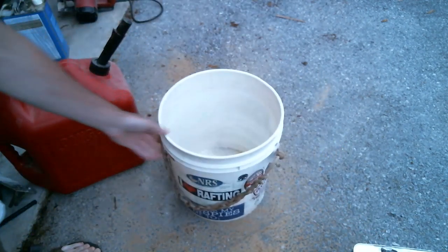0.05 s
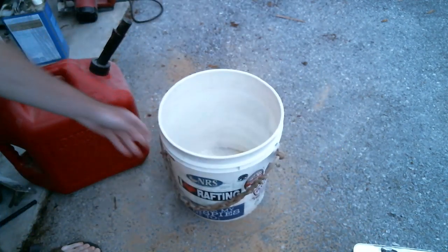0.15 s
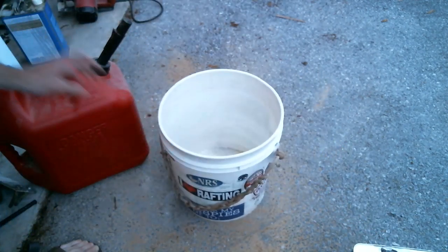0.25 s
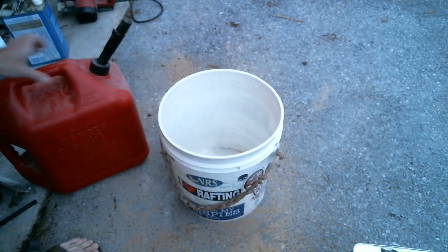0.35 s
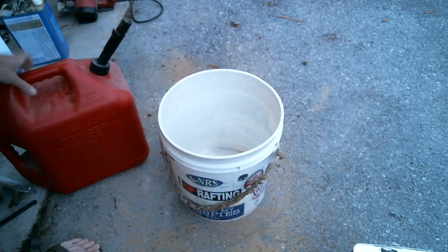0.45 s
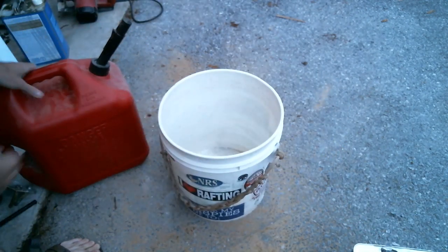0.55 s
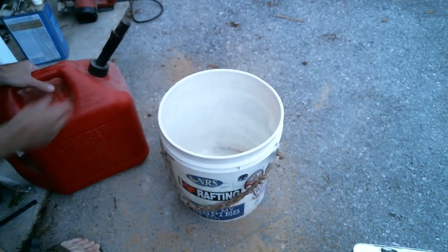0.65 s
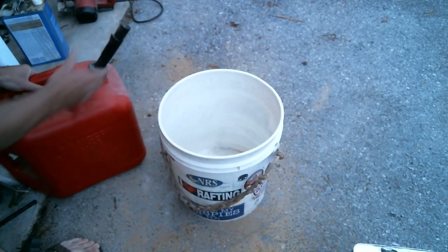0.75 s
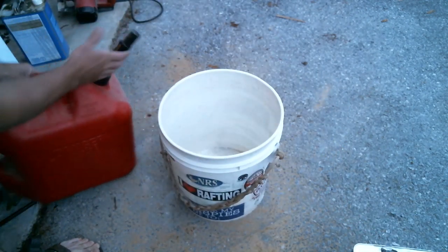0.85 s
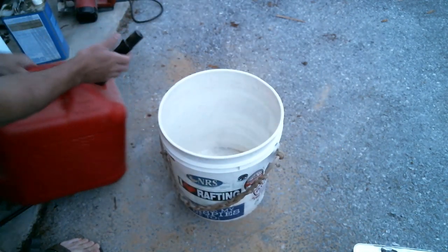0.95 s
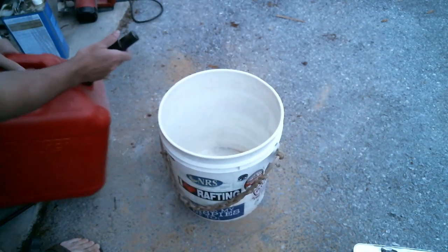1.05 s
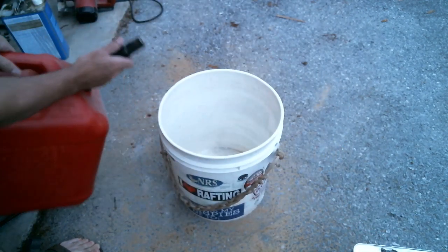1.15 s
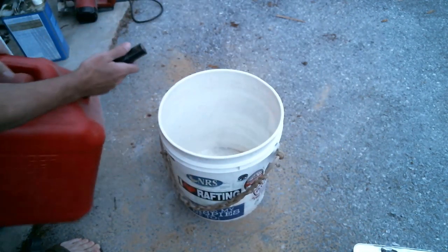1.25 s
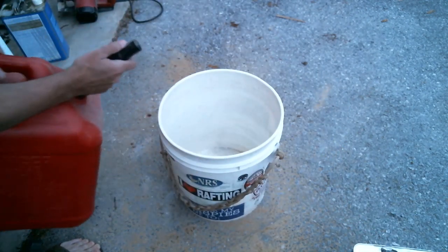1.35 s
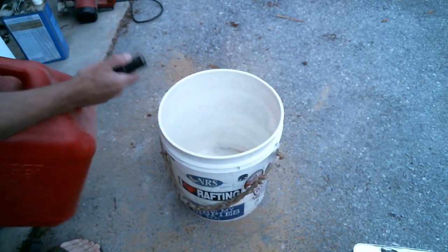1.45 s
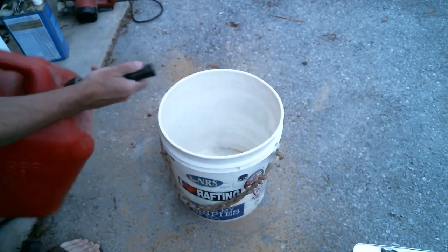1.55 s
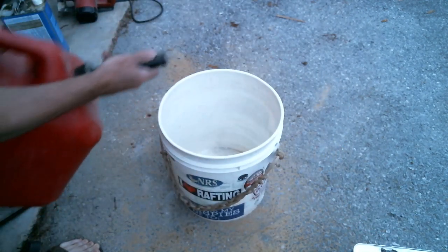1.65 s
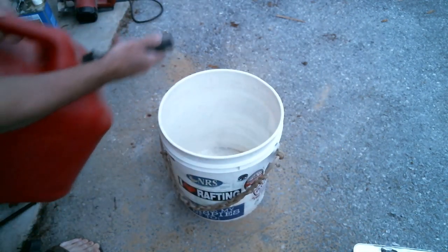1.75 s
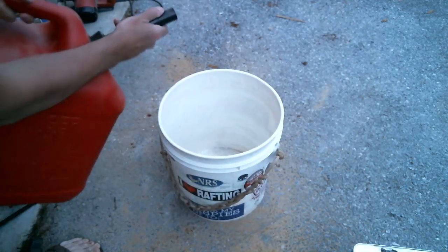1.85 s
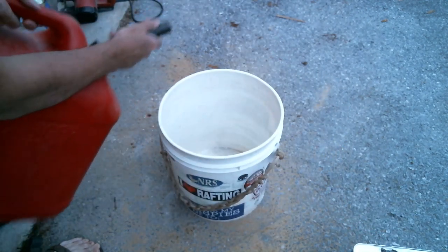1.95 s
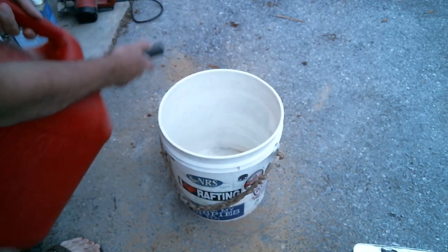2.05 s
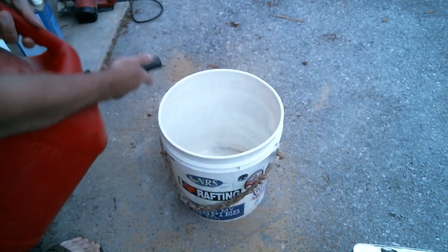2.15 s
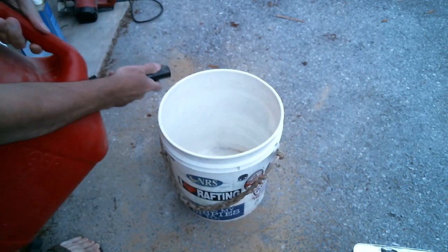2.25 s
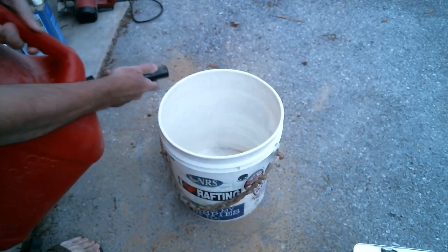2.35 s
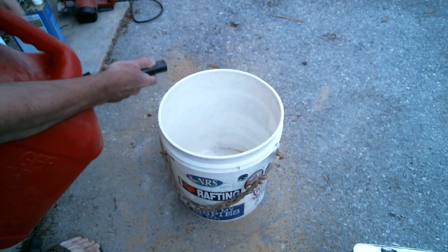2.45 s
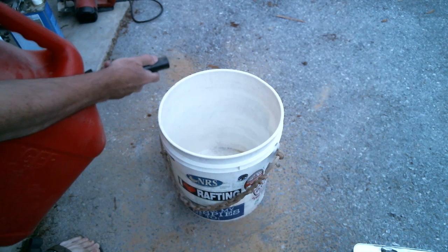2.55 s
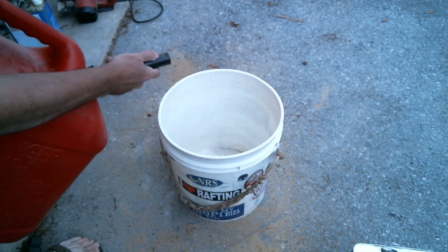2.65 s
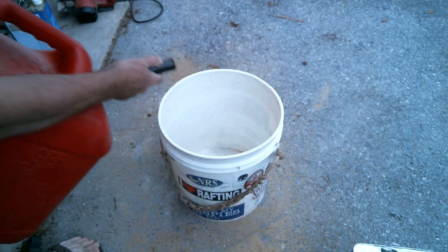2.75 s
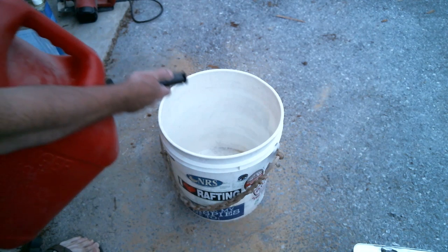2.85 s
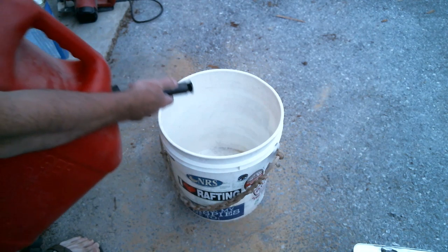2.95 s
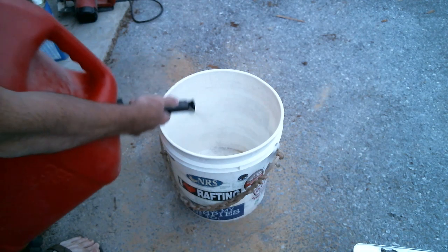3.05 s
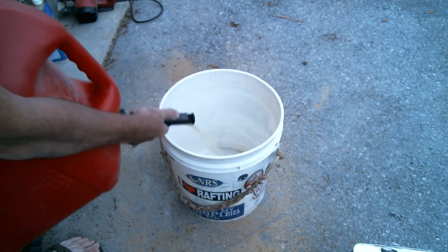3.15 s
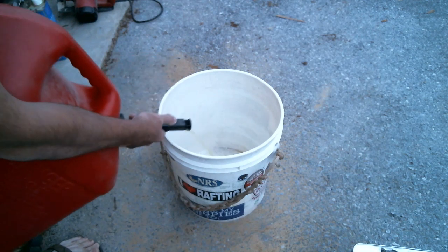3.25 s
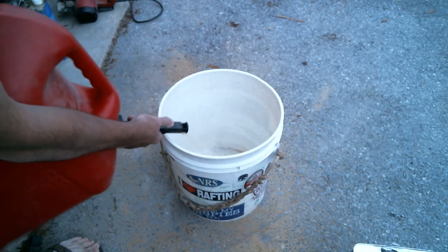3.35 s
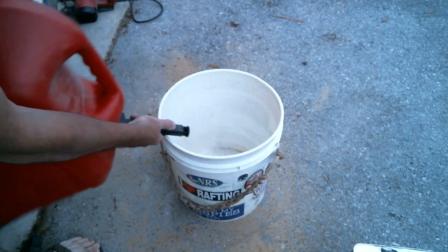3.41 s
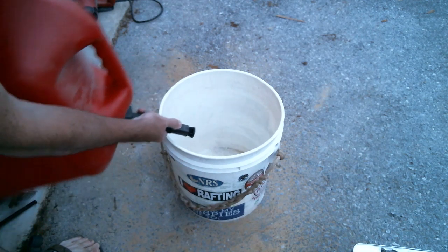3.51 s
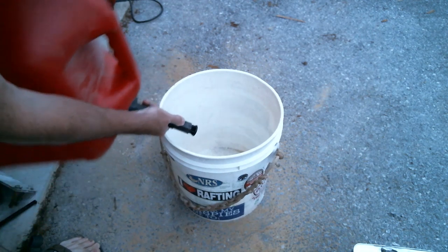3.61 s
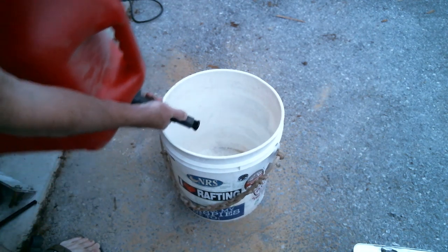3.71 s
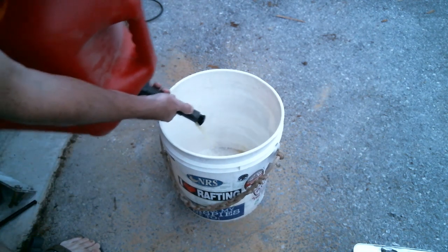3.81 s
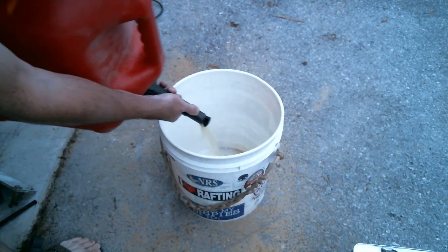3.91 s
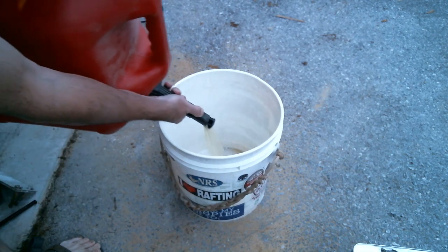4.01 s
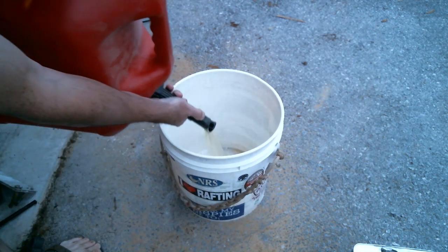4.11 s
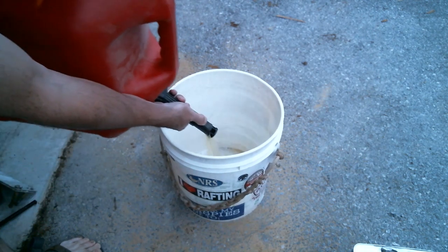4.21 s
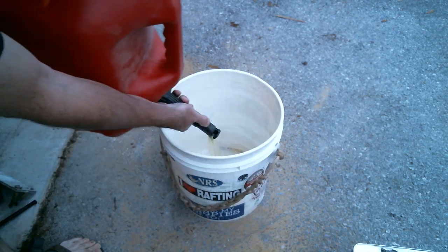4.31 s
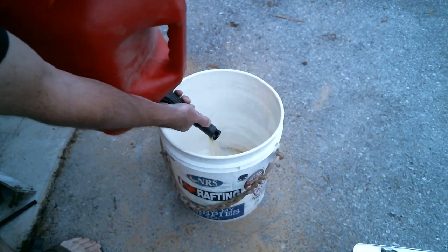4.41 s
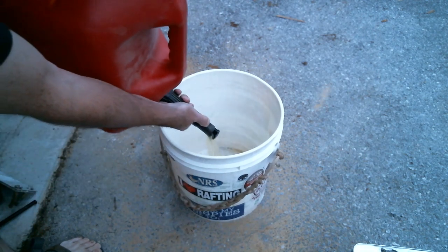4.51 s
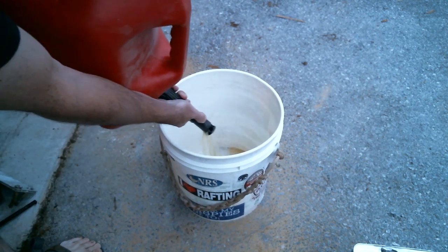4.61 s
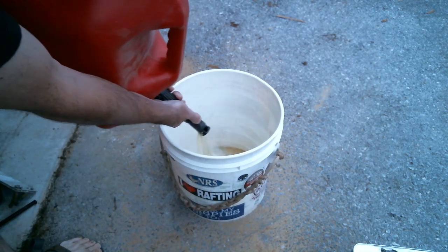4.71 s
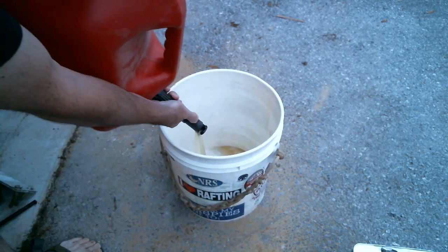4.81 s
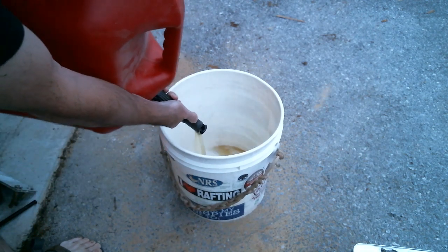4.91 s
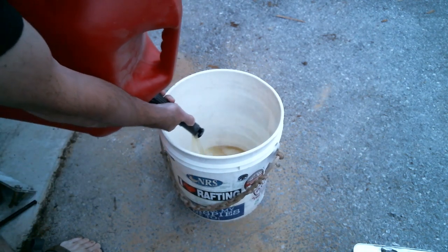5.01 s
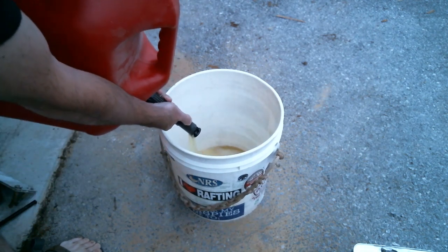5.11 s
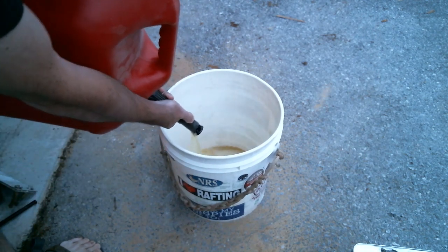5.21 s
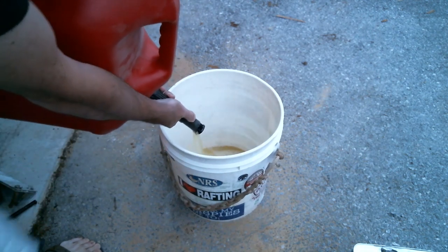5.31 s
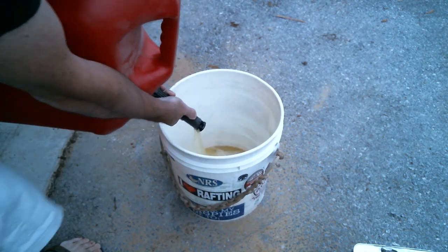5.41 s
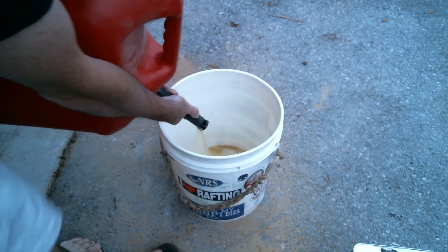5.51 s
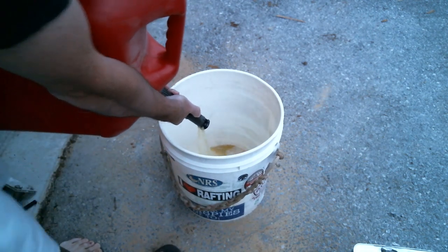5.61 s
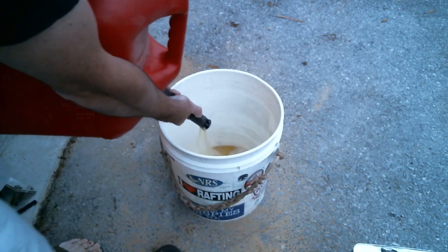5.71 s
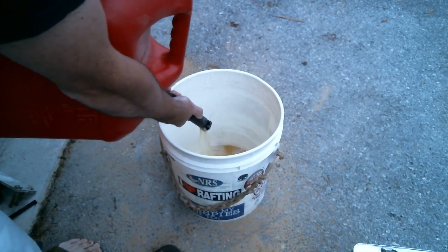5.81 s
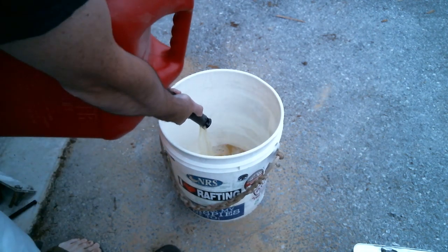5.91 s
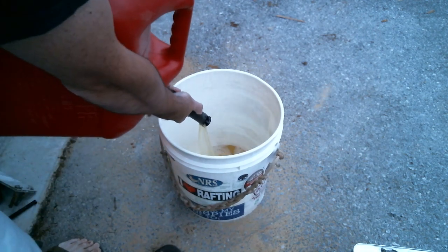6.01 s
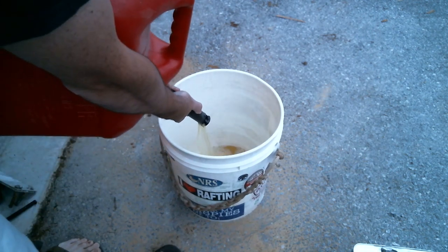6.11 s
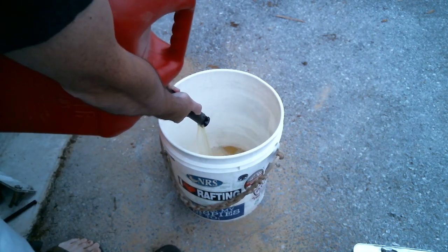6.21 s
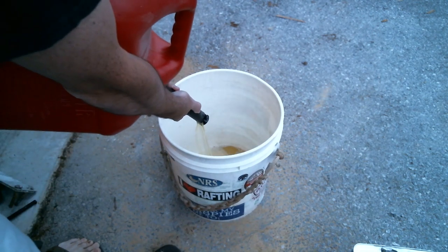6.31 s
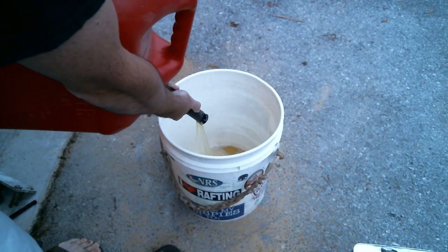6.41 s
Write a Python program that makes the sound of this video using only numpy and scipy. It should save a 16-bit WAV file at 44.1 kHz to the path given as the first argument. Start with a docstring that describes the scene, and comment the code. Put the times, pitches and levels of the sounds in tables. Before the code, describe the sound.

A plastic fuel can is gripped, knocked and tipped outdoors, then liquid splatters in drops and a broken stream into a hollow plastic bucket.

```python
"""Outdoors a bucket rings and takes a soft thud while hum tones fade; a far engine idles under steady air.
A full plastic fuel can is gripped, dragged, lifted and tipped: noise rubs, struck modes and gliding glugs.
Early on something metal clinks once, a set of dying partials. First drops, then a broken stream splash into
the plastic bucket: random droplet noise through resonances of its walls, air column and floor.
One microphone feeds both channels."""
import sys
import numpy as np
from scipy import signal
from scipy.io import wavfile
from scipy.ndimage import uniform_filter1d

SR = 44100
rng = np.random.default_rng(int(sys.argv[2]) if len(sys.argv) > 2 else 0)


def to_wav(s):
    """Save 16-bit WAV."""
    ch = np.atleast_2d(s).T  # columns
    pcm = np.round(np.clip(ch, -1, 1) * 32767)  # PCM
    wavfile.write(sys.argv[1], SR, pcm.astype(np.int16))


def decibels_to_gain(level_db):
    """Convert a level in decibels to a linear amplitude gain (20 dB per decade)."""
    exponent = np.asarray(level_db, float) / 20
    return 10 ** exponent


N = 284886  # samples
T = np.arange(N) / SR  # seconds
COLUMN_HZ, FLOOR_HZ = 1000, 265  # the bucket's air column and its floor


def evened(x):
    """Scales to rms 1."""
    return x / np.sqrt(np.mean(x ** 2) + 1e-20)


def curve(tables, count, rest=-120.):
    """Joins column count of one or more tables over time, resting outside them."""
    out = np.full(N, rest)
    for table in tables:
        table = np.array(table)
        inside = (T >= table[0, 0]) & (T <= table[-1, 0])
        out[inside] = np.interp(T[inside], table[:, 0], table[:, count])
    return out


def add(mix, start_s, sound):
    """Lays a sound into the mix at a time."""
    part = mix[max(round(start_s * SR), 0):][:len(sound)]
    part += sound[:len(part)]


def filtered(x, order, hz, kind):
    """Runs a low or high pass with its corner at hz."""
    return signal.sosfilt(signal.butter(order, hz, kind, fs=SR, output="sos"), x)


def resonate(x, hz, width):
    """Shifts the curve hz down to zero, smooths, and shifts back: a resonance of gain 1."""
    turn = np.exp(2j * np.pi * np.cumsum(hz * np.ones(len(x))) / SR)
    r = np.exp(-np.pi * width / SR)
    return 2 * (turn * signal.lfilter([1 - r], [1, -r], x / turn)).real


def twice(x, hz, width):
    """A steep resonance: the same one applied two times."""
    return resonate(resonate(x, hz, width), hz, width)


def colour(x, spectrum, patchy_db, size):
    """Shapes short-time spectra, with random patches that come and go, to rms 1."""
    hz, _, z = signal.stft(x, SR, nperseg=size, noverlap=size * 3 // 4)
    f, db = np.transpose(spectrum)
    patches = rng.standard_normal(z.shape[::-1]).T
    patches = uniform_filter1d(patches, size=9, axis=0)
    patches = evened(uniform_filter1d(patches, size=9, axis=1))
    shape_db = np.interp(np.log(hz + 1), np.log(f + 1), db)[:, None]
    z = z * decibels_to_gain(shape_db + patchy_db * patches)
    return evened(signal.istft(z, SR, nperseg=size, noverlap=size * 3 // 4)[1][:N])


def droplets(per_s, spread_db, t60):
    """Random impacts, a few large, each a short dying burst of noise."""
    size = decibels_to_gain(spread_db * np.minimum(rng.exponential(1, N), 4))
    size = size * (rng.random(N) < per_s / SR)
    t = T[:3000]
    fade = decibels_to_gain(-120 * t / t60) * np.minimum(t / 0.003, 1)  # of power; wet: a soft start
    power = signal.oaconvolve(size ** 2, fade)[:N]
    return np.sqrt(abs(power)) * rng.standard_normal(N)


def ring(modes, detune, seconds):
    """Dying partials of a struck object."""
    t = T[:round(seconds * SR)]
    return sum(decibels_to_gain(db - 60 * t / t60) * np.sin(2 * np.pi * hz * d * t)
               for (hz, db, t60), d in zip(modes, detune))


def pop(hz, width, t60, noise):
    """A short burst of noise through one broad resonance, peak 1."""
    t = T[:len(noise)]
    burst = noise * decibels_to_gain(-60 * t / t60) * np.minimum(t / 0.0011, 1)
    burst = twice(burst, hz, width)
    return burst / abs(burst).max()


def surges(rows):
    """Gain that swells and sinks in one arch for each row."""
    out = np.zeros(N)
    for start_s, length_s, db in rows:
        arch = np.sin(np.pi * T[:round(length_s * SR)] / length_s) ** 0.8
        add(out, start_s, decibels_to_gain(db) * arch)
    return out


def whistles(rows, width):
    """Lumpy noise swells through one narrow resonance for each row."""
    out = np.zeros(N)
    source = droplets(600, 2.5, .04)
    for start_s, length_s, db, hz in rows:
        part = source[round(start_s * SR):][:round(length_s * SR)]
        arch = np.sin(np.pi * T[:len(part)] / length_s)
        add(out, start_s, decibels_to_gain(db) * arch * evened(twice(part, hz, width)))
    return out


def open_air():
    """Steady low-weighted noise in which faint rustles come and go."""
    # spectrum of the air: hz, relative_db (per Hz)
    air_spectrum = [(50, -27.5), (106, 0), (155, -1.5), (260, -10.5), (867, -19), (10300, -36),
                    (14000, -55)]
    noise = rng.standard_normal(N) + droplets(20, 3., 0.1)
    return decibels_to_gain(-58) * colour(noise, air_spectrum, 2.9, size=1024)


def hum():
    """Thin steady tones that fade out just after the start."""
    # tones: pitch_hz, level_db (rms)
    tone_table = [(382.2, -60.5), (554.5, -68)]
    tones = sum(np.sqrt(2) * decibels_to_gain(db) * np.sin(2 * np.pi * (hz * T + rng.random()))
                for hz, db in tone_table)
    return tones * np.clip((.52 - T) / 0.13, 0, 1)


def engine():
    """A distant idling engine: firings of uneven strength ring the exhaust."""
    # idle level over time: time_s, level_db
    idle_level = [(0, -59.5), (2.2, -56), (3, -79.5), (6.46, -61)]
    # exhaust resonance: centre_hz, width_hz (of its narrower pass), relative_db
    exhaust = [(143, 16, 8)]
    firings_per_s, starting_turn = 16.4, .63
    turns = firings_per_s * T + starting_turn
    strength = decibels_to_gain(2.5 * rng.standard_normal(200))[turns.astype(int)]
    firings = np.diff(np.floor(turns), prepend=0) * strength
    pipe = sum(decibels_to_gain(db) * resonate(resonate(firings, hz, width), hz, 6.1 * width)
               for hz, width, db in exhaust)
    return decibels_to_gain(curve([idle_level], count=1)) * evened(pipe)


def strokes(count):
    """Gain of the rubs in one column: a curved rise in dB to the top, then a fall."""
    # hands, cloth and feet rubbing: start_s, rise_s, fall_s, hiss_top_db, scuff_top_db
    rubs = [(0.501, 0.091, 0.27, -50, -93), (0.79, 0.096, 0.015, -47.5, -39), (1.429, 0.13, 0.2, -44, -67),
            (1.56, 0.36, 0.075, -76, -63), (1.916, 0.024, 0.041, -53.5, -41),
            (2.366, 0.16, 0.054, -36, -40.5), (2.622, 0.03, 0.045, -60, -48.5),
            (2.691, 0.005, 0.042, -65, -47), (2.769, 0.039, 0.038, -45.5, -56.5),
            (3.04, 0.02, 0.031, -62.5, -54.5), (3.715, 0.0031, 0.12, -46.5, -36.5)]
    edge_db = -19.5  # a rub swells from and dies to this far under its top
    out = np.zeros(N)
    for row in rubs:
        start_s, rise_s, fall_s = row[:3]
        t = T[:round((rise_s + fall_s) * SR)]
        from_top = np.maximum(1 - t / rise_s, (t - rise_s) / fall_s)
        add(out, start_s, decibels_to_gain(row[count] + edge_db * from_top ** 1.385))
    return out


def rubbing():
    """Smooth hiss of skin and cloth, with a grainier scuff below it."""
    # spectrum of skin and cloth: hz, relative_db (per Hz)
    hiss_spectrum = [(2060, -70), (3500, -26.5), (8360, -10), (10700, -14.5), (12600, -25.5), (15000, -39)]
    # spectrum of the scuff: hz, relative_db (per Hz)
    scuff_spectrum = [(470, -6), (800, -3.5), (1600, -3.5), (2290, -4.5), (5000, -8), (6500, -15),
                      (11000, -120)]
    hiss = colour(rng.standard_normal(N), hiss_spectrum, 2.0, size=256)
    scuff = colour(droplets(470, 2.5, 0.045), scuff_spectrum, 3.5, size=512)
    return strokes(count=3) * hiss + strokes(count=4) * scuff


def narrow_swells():
    """Drips and bubbles in the fuel can ring briefly: swells of noise through narrow resonances."""
    # drips and bubbles: start_s, length_s, level_db, pitch_hz
    swell_table = [(1.51, 0.11, -56, 1970), (1.52, 0.09, -55.5, 2990), (1.62, 0.13, -53.5, 3050),
                   (1.67, 0.08, -53.5, 875), (1.945, 0.022, -47, 1228), (1.945, 0.051, -48.5, 850),
                   (2.2, 0.036, -53.5, 1213), (2.35, 0.027, -49.5, 1000), (2.47, 0.053, -45.5, 1590),
                   (2.056, 0.052, -55.5, 3130)]
    return whistles(swell_table, 290.0)


def bump():
    """The empty bucket is set down: it still rings, then takes one soft thud."""
    out = np.zeros(N)
    add(out, 0, decibels_to_gain(-32.5) * ring([(219.0, 0.01, 0.6)], [1], 0.074))
    thud = ring([(FLOOR_HZ, 0, .06), (COLUMN_HZ, -20, .08)], [1, 1], .1)
    add(out, .018, decibels_to_gain(-15.5) * thud * np.minimum(T[:len(thud)] / 0.0048, 1))
    return out


def can_knocks():
    """Blows ring the can's walls, crack briefly and make the fuel inside shudder."""
    # blows: start_s, wall_peak_db, crack_db (relative to the walls)
    knocks = [(0.859, -13.5, -4.5), (2.385, -32, -6), (3.724, -13.5, 1.5), (3.815, -17, -9)]
    # modes of the walls: pitch_hz (before detuning), relative_db, t60_s
    can_modes = [(168.6, 8.5, 0.12), (289.7, 13.5, 0.094), (676, 5.5, 0.093), (1688, 2, 0.053)]
    out = np.zeros(N)
    for (start_s, db, bright_db), chance in zip(knocks, rng.standard_normal((len(knocks), 4000))):
        walls = ring(can_modes, 1 + 0.094 * chance, .15)
        add(out, start_s, decibels_to_gain(db) * walls / abs(walls).max())
        add(out, start_s, decibels_to_gain(db + bright_db) * pop(480, 2550, 0.094, chance))
        add(out, start_s, decibels_to_gain(db - 3.0) * pop(318, 430, 0.24, chance[::-1]))  # the fuel shudders
    return filtered(out, 2, 140, "high")


def cap_ticks():
    """Small ticks at the cap and spout: short bursts of resonant noise."""
    # ticks: start_s, level_db (relative), centre_hz
    tick_table = [(0.616, -31, 4800), (0.828, -25, 1870), (0.901, -15.5, 3500), (1.4283, -21.5, 9200),
                  (3.1, -27, 5020)]
    out = np.zeros(N)
    for (start_s, db, hz), chance in zip(tick_table, rng.standard_normal((len(tick_table), 1500))):
        tick = twice(pop(hz, 0.5 * hz, 0.021, chance), hz, hz)
        add(out, start_s, decibels_to_gain(db) * evened(tick) / 12)
    return out


def sloshing():
    """Air pockets in the moving fuel glug and chirp: wobbling tones that rise in pitch."""
    # glugs and chirps: start_s, peak_db, middle_pitch_hz, length_s
    slosh_table = [(0.901, -32, 346, 0.041), (1.924, -35, 746, 0.011), (1.93, -25.5, 885, 0.011),
                   (1.94, -28, 1030, 0.009), (2.406, -40.5, 350, 0.11), (2.731, -39.5, 306, 0.06),
                   (2.778, -33.5, 375, 0.053), (2.806, -33.5, 279, 0.09), (2.841, -28, 122, 0.028),
                   (3.052, -30.5, 141, 0.11), (3.109, -35, 384, 0.036), (3.121, -30.5, 143, 0.096),
                   (3.785, -20, 121, 0.028), (3.845, -27.5, 135.5, 0.07), (3.891, -32.5, 185, 0.045)]
    out = np.zeros(N)
    for (start_s, db, hz, length_s), chance in zip(slosh_table,
                                                 rng.standard_normal((len(slosh_table), 5000))):
        u = T[:round(length_s * SR)] / length_s
        wobble = 22 / np.sqrt(hz) * uniform_filter1d(chance, size=150)[:len(u)]  # large pockets wobble more
        waver = 1 + 0.16 * (u - .5) + wobble  # a pocket rises as it shrinks
        swell = np.sin(np.pi * u ** 0.41) ** 2
        add(out, start_s, decibels_to_gain(db) * swell * np.sin(2 * np.pi * np.cumsum(hz * waver) / SR))
    return out


def clink():
    """A metal part is struck: a crack, long partials and a short clatter."""
    # partials of the metal: pitch_hz, relative_db, t60_s
    metal = [(1760, -14, .21), (2503, -24, .15), (3375, -25, .6), (3981, 0, .16), (5416, -16, .22),
             (5742, -10, .24), (6352, -24, .25), (6930, -23, .22), (7905, -12, .15), (8387, -23, .2),
             (10425, -21, .19)]
    start_s = 1.100
    partials = ring(metal, np.ones(len(metal)), .3)
    t = T[:len(partials)]
    partials *= 1 - .8 * np.exp(-((t - .083) / .009) ** 2)  # the ring dips briefly
    partials *= np.clip((.17 - t) / 0.047, 0, 1)  # a hand damps it
    out = np.zeros(N)
    add(out, start_s, decibels_to_gain(-5) * partials / abs(partials).max())
    add(out, start_s, decibels_to_gain(-10.0) * pop(2400, 5000, 0.021, rng.standard_normal(3000)))
    add(out, start_s, decibels_to_gain(-12.5) * pop(1750, 190, 0.18, rng.standard_normal(7000)))
    add(out, start_s, decibels_to_gain(-16.5) * pop(1300, 5600, 0.23, rng.standard_normal(7000)))
    return filtered(out, 2, 350, "high")  # too small to move bass


def floor_boom(flowing):
    """Lumpy flow booms the bucket's floor, in surges over a faint steady level."""
    # surges on the floor: start_s, length_s, level_db
    booms = [(3.33, 0.33, -48.5), (4.96, 0.078, -48), (5.14, 0.073, -50), (5.5, 0.15, -41),
             (5.63, 0.097, -37.5), (5.73, 0.053, -42), (5.79, 0.12, -40.5), (5.94, 0.15, -42.5),
             (6.09, 0.086, -43), (6.22, 0.19, -46)]
    gain = surges(booms) + decibels_to_gain(-57.5) * flowing
    return gain * evened(twice(droplets(150, 4.0, 0.042), FLOOR_HZ, 49))


def air_column(walls_db):
    """The air in the bucket rings steadily with the walls and in narrow surges; one lower surge is a gurgle."""
    # narrow surges, mostly of the air column, one a lower gurgle: start_s, length_s, level_db, pitch_hz
    ring_surges = [(4.7, 0.21, -45, 610), (5.11, 0.22, -44.5, 1000), (5.4, 0.076, -41, 1003),
                   (5.48, 0.041, -27, 984), (5.52, 0.11, -39.5, 980), (5.78, 0.17, -48.5, 980)]
    steady = evened(twice(droplets(210, 5.2, 0.032), COLUMN_HZ, 94))
    return decibels_to_gain(walls_db - 6.5) * steady + whistles(ring_surges, 55.)


def wall_drumming(walls_db, heavy):
    """One lumpy flow shakes all the walls, and each is also struck from its own spot."""
    # wall resonances: centre_hz, width_hz (of each of two passes), relative_db
    bucket_walls = [(533.5, 137, -4), (788, 65, -2), (1493, 550, 6), (1677, 210, -2.5)]
    flow = droplets(180, 6.72, 0.033) + 1.82 * heavy
    drumming = sum(decibels_to_gain(db) * evened(twice(flow + 0.3 * droplets(90, 5.6, 0.04), hz, width))
                   for hz, width, db in bucket_walls)
    return decibels_to_gain(walls_db) * evened(filtered(drumming, 4, 2000, "low"))  # thick walls carry no treble


def wall_raps():
    """Gouts of fuel rap the wall, each a short broad resonant burst."""
    # raps: start_s, peak_db, centre_hz
    rap_table = [(3.443, -28, 1050), (3.6, -25, 1400), (3.696, -29, 613), (4.526, -18, 1280),
                 (5.104, -33.5, 1590), (5.496, -20, 1070), (5.644, -22.5, 1510), (6.276, -33, 1450)]
    out = np.zeros(N)
    for (start_s, db, hz), chance in zip(rap_table, rng.standard_normal((len(rap_table), 2500))):
        add(out, start_s, decibels_to_gain(db) * pop(hz, 820, 0.065, chance))
    return out


def splats():
    """Large drops snap on landing and burst into spray; they are too small to move any bass."""
    # large drops landing: start_s, snap_db (peak before the bass cut), centre_hz
    splat_table = [(3.3279, -13, 6300), (3.427, -18.5, 8600), (3.454, -13, 10100), (3.4969, -9.5, 6760),
                   (3.532, -21, 5770), (3.601, -18, 9050), (3.6433, -7.5, 8230), (3.697, -18, 3660),
                   (4.0609, -20.5, 9200), (4.074, -12, 6660), (4.126, -7, 5160), (4.1538, -11.5, 6600),
                   (4.179, -12, 4900), (4.2045, -16, 7400), (4.253, -29, 4030), (4.281, -16.5, 2970),
                   (4.333, -14.5, 7600), (4.361, -19, 4800), (4.4325, -15, 5230), (4.468, -25, 5600),
                   (4.5228, -14.5, 6800), (4.549, -15.5, 7050), (4.617, -23, 3660), (4.686, -17.5, 5540),
                   (4.754, -21.5, 5200), (4.772, -20, 5200), (4.843, -8, 6150), (4.8645, -17, 9600),
                   (4.9338, -13.5, 8300), (5.029, -13.5, 6460), (5.039, -10.5, 7400), (5.0645, -13.5, 9400),
                   (5.073, -16.5, 9500), (5.1914, -13, 9500), (5.261, -18, 4300), (5.271, -22.5, 3550),
                   (5.405, -20, 8200), (5.4157, -13.5, 9000), (5.437, -11.5, 10000), (5.494, -12.5, 8100),
                   (5.522, -28, 6600), (5.618, -21.5, 6060), (5.7308, -7.5, 7860), (5.7869, -12.5, 7900),
                   (5.793, -25, 4800), (5.836, -9.5, 9000), (5.8688, -21, 8050), (5.9295, -19, 6570),
                   (6.018, -17, 9000), (6.0472, -24, 8600), (6.066, -14, 9300), (6.135, -19.5, 8100),
                   (6.06, -25, 3830), (6.2606, -21.5, 3630), (6.299, -18, 3750), (6.313, -17, 7500),
                   (6.4076, -28.5, 4000)]
    spray_hz, glide_s = 9000, 0.0075  # each burst glides towards this pitch
    snap_cycles = 45  # the snap falls 60 dB within this many cycles
    out = np.zeros(N)
    for (start_s, db, hz), chance in zip(splat_table, rng.standard_normal((len(splat_table), 2, 2500))):
        burst_hz = hz + (spray_hz - hz) * (1 - np.exp(-T[:len(chance[1])] / glide_s))
        snap = pop(hz, 0.41 * hz, snap_cycles / hz, chance[0])
        drop = snap + decibels_to_gain(-8.5) * pop(burst_hz, 3300, 0.048, chance[1])
        add(out, start_s, decibels_to_gain(db) * filtered(drop, 4, 0.55 * hz, "high"))
    return out


def splashing(spray_db, walls_db, heavy):
    """Fine spray, beads, heavier slaps and single splats, the finest mist thinning out."""
    # spectrum of the spray: hz, relative_db (per Hz)
    spray_spectrum = [(2400, -38), (3240, -31), (5500, -24), (6640, -14), (9440, -6.5), (16000, -26.5)]
    mist = droplets(330, 4.0, 0.022) + 0.05 * rng.standard_normal(N)
    mist = colour(mist, spray_spectrum, 2.43, size=256)
    # separate droplets each chirp in their own band
    beads = sum(evened(twice(twice(droplets(41, 3.7, 0.0092), hz, 3900), hz, 3900))
                for hz in np.geomspace(6700, 10340, 4))
    slaps = evened(twice(twice(heavy, 5100, 3700), 4300, 3760))
    # heavy drops give way to fine spray as the pool deepens: -8 dB per second from 4.25 s
    slap_db = (spray_db + walls_db) / 2 + 1 - 8 * np.maximum(T - 4.25, 0)
    out = decibels_to_gain(spray_db) * (mist + 0.28 * beads) + decibels_to_gain(slap_db) * slaps + splats()
    # the finest mist thins as the stream weakens: -12.5 dB per second from 5.32 s
    coarse = signal.sosfiltfilt(signal.butter(4, 10100, fs=SR, output="sos"), out)
    return coarse + decibels_to_gain(-12.5 * np.maximum(T - 5.32, 0)) * (out - coarse)


def pour():
    """First drops, then a stream: splashes, drummed walls, ringing air, a booming floor and raps."""
    # first drops, then the stream, one table each: time_s, spray_db, walls_db (drumming)
    stream = [
        [(3.32, -29.5, -51.5), (3.42, -53, -48), (3.52, -62, -49), (3.68, -101, -70)],
        [(4.06, -58, -49.5), (4.16, -31, -39), (4.43, -35, -45.5), (4.52, -38, -37.5), (4.61, -34.5, -45),
         (4.86, -34.5, -38.5), (5.0, -33, -52.5), (5.15, -40, -50.5), (5.25, -33, -52.5), (5.36, -43, -54.5),
         (5.42, -40, -43.5), (5.48, -48, -52.5), (5.52, -33, -49), (5.68, -37.5, -47), (5.77, -35, -64),
         (5.94, -45, -54.5), (6.05, -34.5, -58.5), (6.22, -45, -59.5), (6.31, -40.5, -48), (6.46, -50, -64)],
    ]
    spray_db, walls_db = curve(stream, count=1), curve(stream, count=2)
    heavy = droplets(140, 3.5, 0.04)  # the same drops slap and shake the walls
    out = splashing(spray_db, walls_db, heavy) + wall_drumming(walls_db, heavy)
    return out + air_column(walls_db) + floor_boom(spray_db > -100) + wall_raps()


def scene():
    """Everything reaches one microphone."""
    background = open_air() + hum() + engine()
    handling = rubbing() + narrow_swells() + can_knocks() + cap_ticks() + sloshing()
    mono = background + handling + bump() + clink() + pour()
    return np.array([mono, mono])


def band_limit(x):
    """A steep low-pass at the top of the band."""
    return signal.sosfilt(signal.butter(12, 16650, fs=SR, output="sos"), x)


def record(dry):
    """The microphone drops the deep bass and the top treble."""
    x = filtered(dry, 3, 95, "high")
    x = filtered(x, 4, 13000, "low")
    return band_limit(x)


dry = scene()
out = record(dry)
to_wav(out)
```